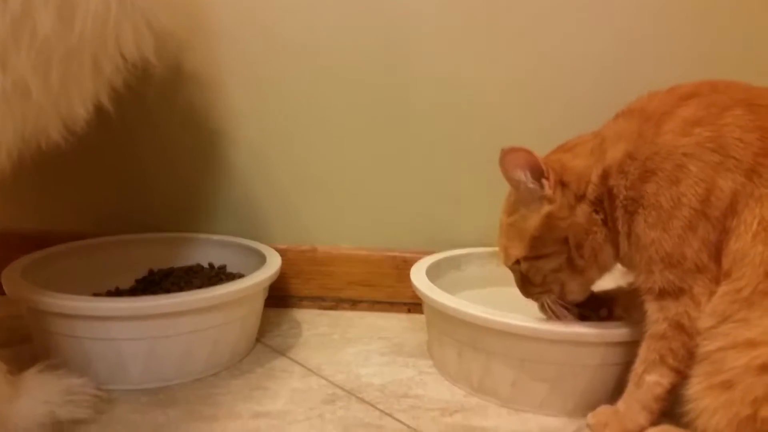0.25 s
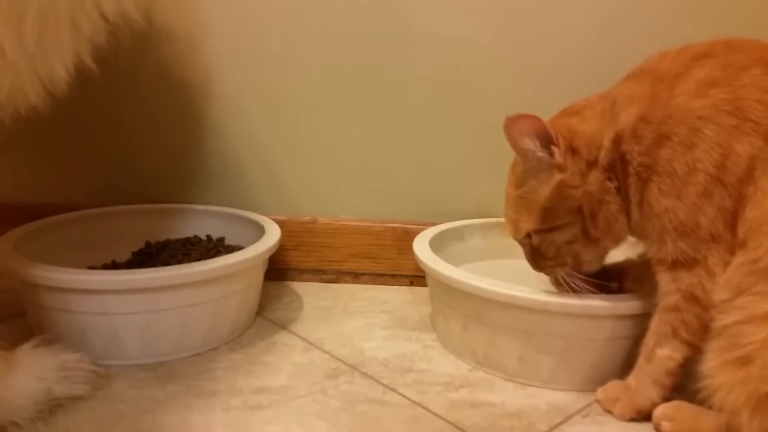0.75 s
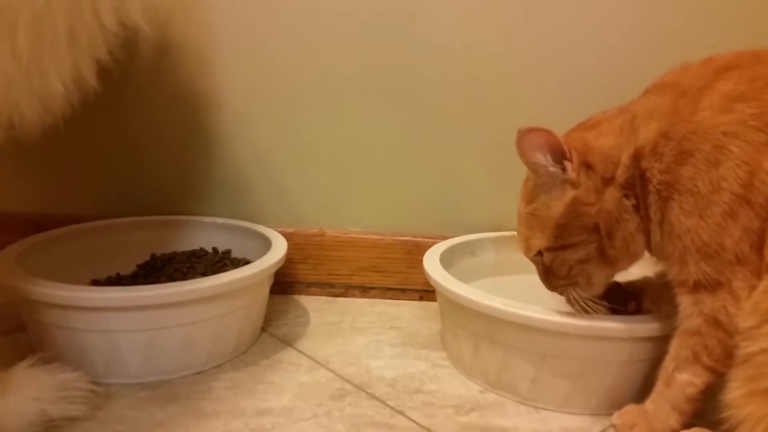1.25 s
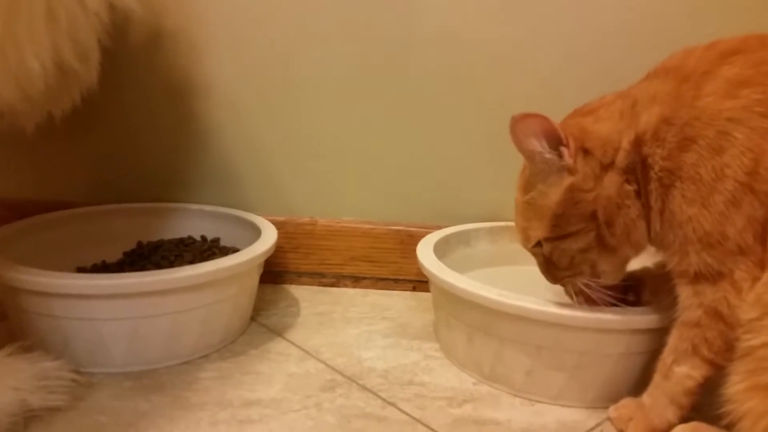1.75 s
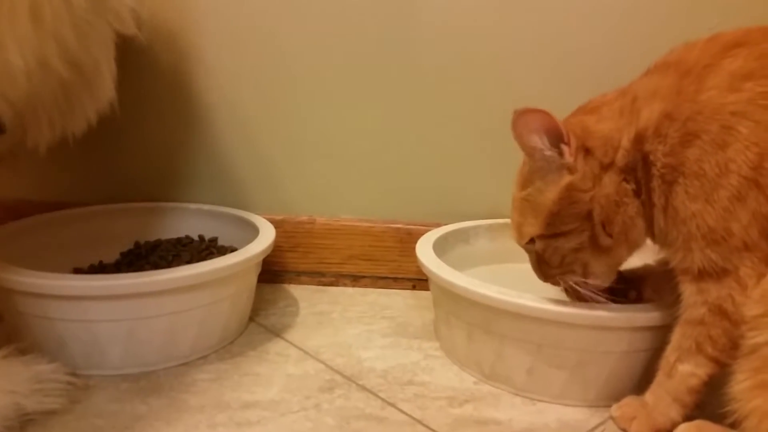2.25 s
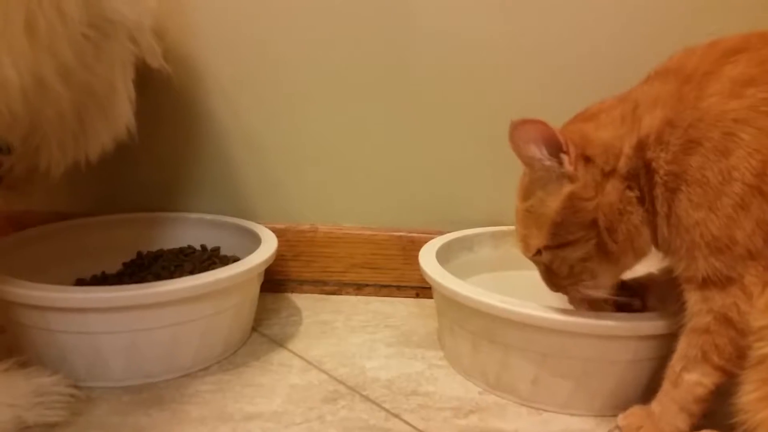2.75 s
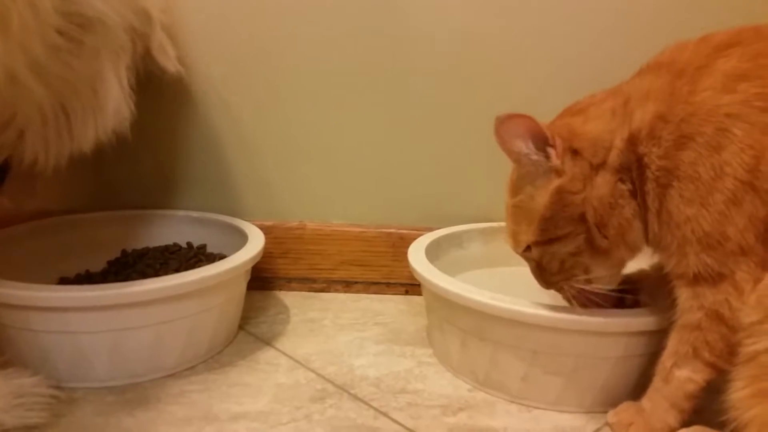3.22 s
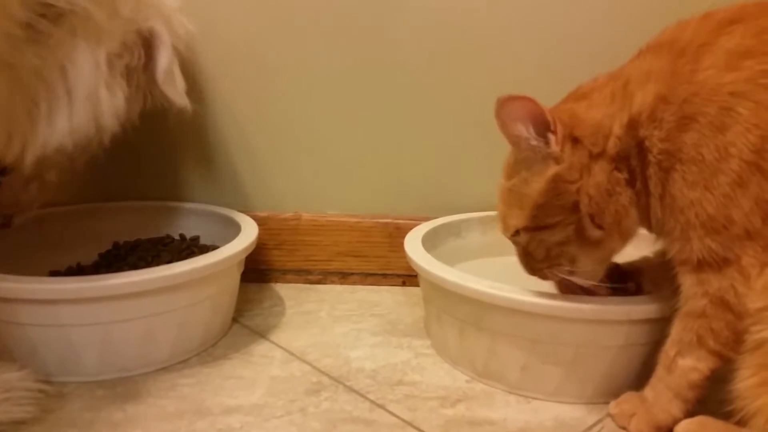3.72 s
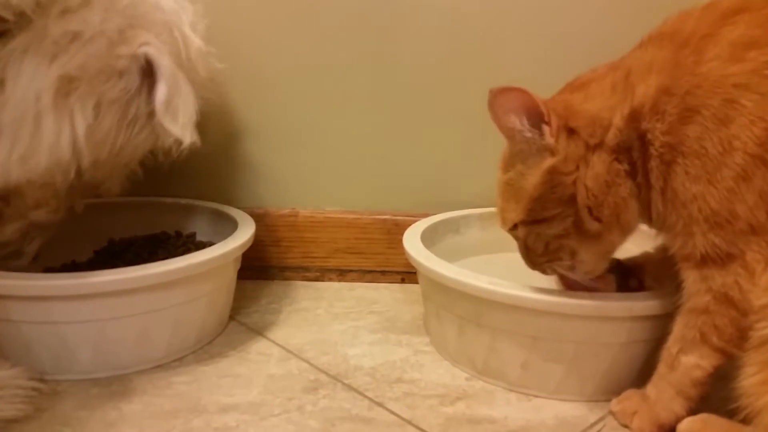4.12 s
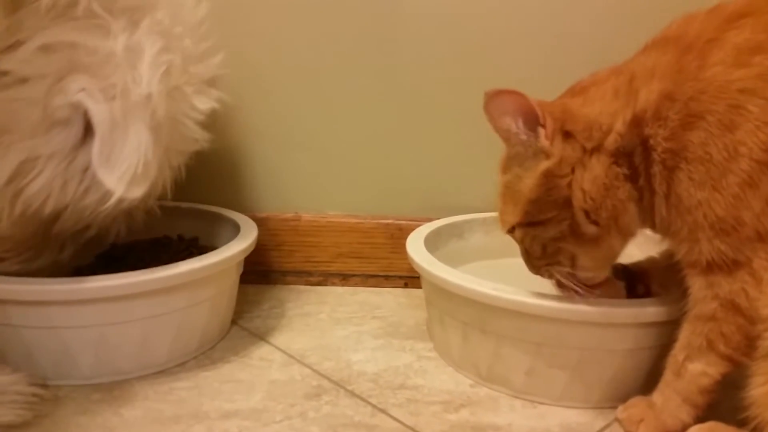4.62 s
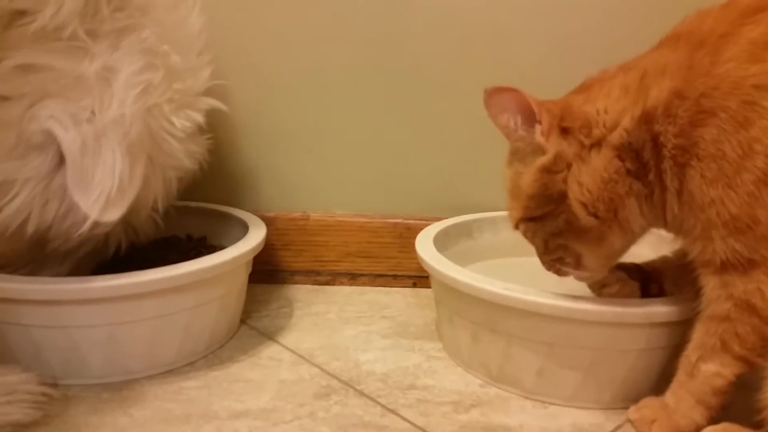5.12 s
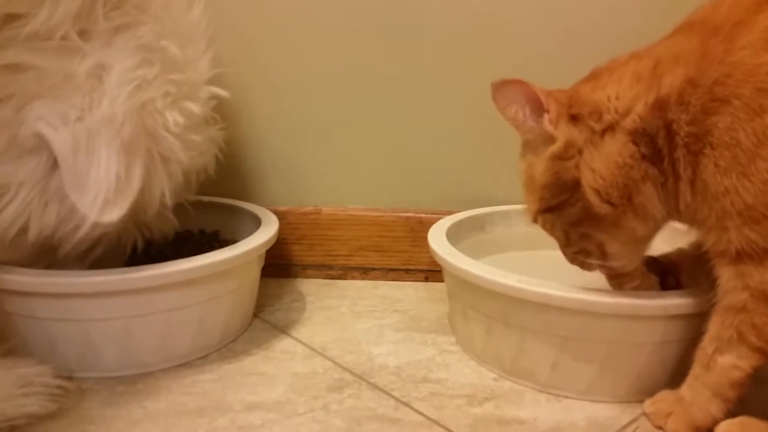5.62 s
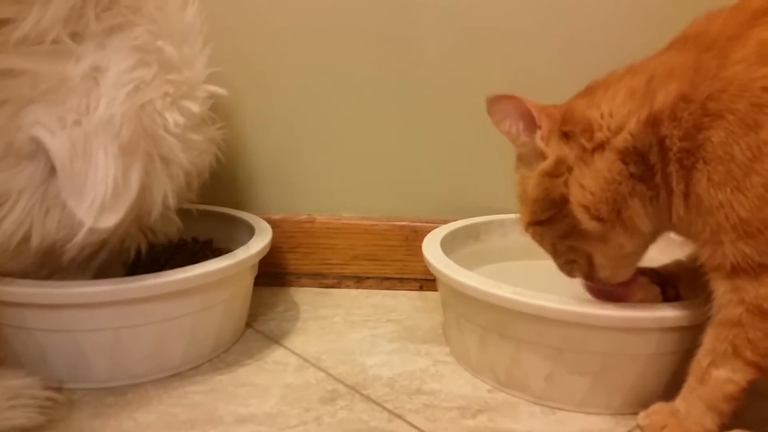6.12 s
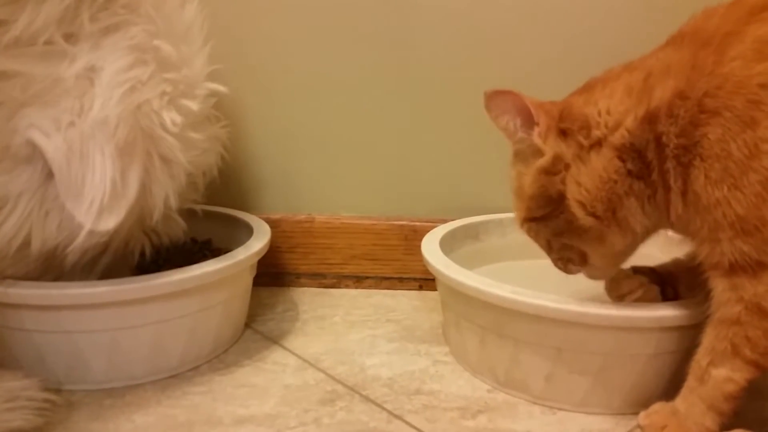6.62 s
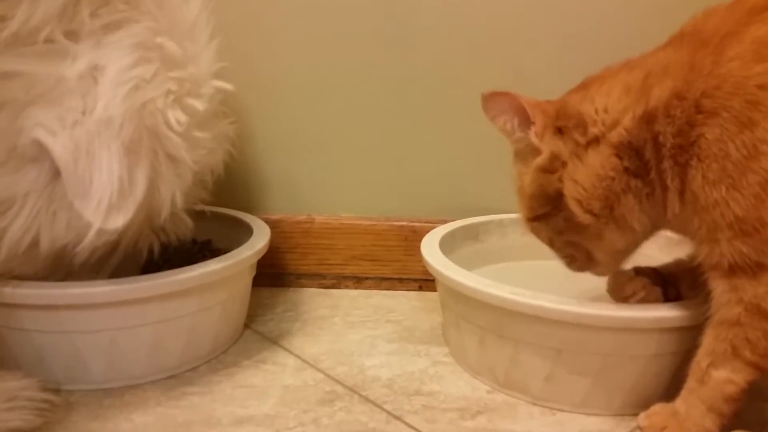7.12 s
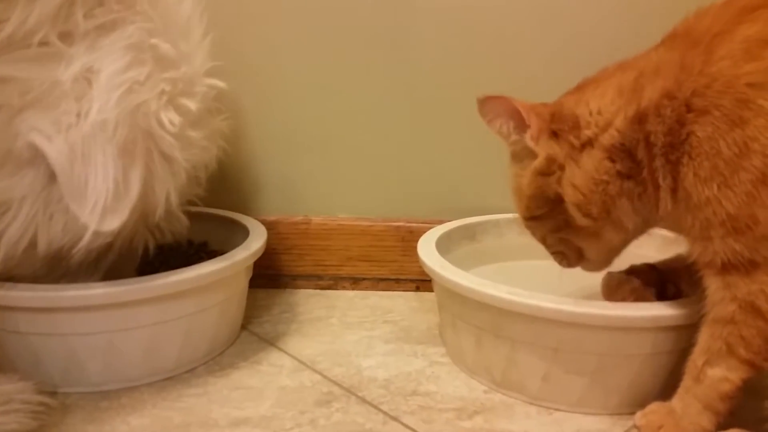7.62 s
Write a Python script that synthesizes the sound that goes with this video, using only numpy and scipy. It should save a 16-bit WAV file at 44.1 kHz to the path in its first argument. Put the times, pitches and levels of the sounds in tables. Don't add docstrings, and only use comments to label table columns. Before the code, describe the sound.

Indoors in a small tiled kitchen, a low refrigerator hum throbs slowly under soft air noise. Close by, a cat laps water with sparse, faint, high wet ticks and a brief fizzy lick. After more than five seconds a dog begins cracking dry kibble on the left: brittle snaps, splinters and grinding crumbs, with dull plastic bowl bumps. A close stereo phone microphone adds faint hiss.

```python
import sys
import numpy as np
from scipy import signal
from scipy.fft import rfft, irfft, next_fast_len
from scipy.io import wavfile
from scipy.ndimage import uniform_filter1d

SR = 44100
rng = np.random.default_rng(int(sys.argv[2]) if len(sys.argv) > 2 else 0)


def unload_audio(sound):
    columns = np.transpose(np.atleast_2d(sound))
    steps = np.round(np.clip(columns, -1, 1) * 32767)
    wavfile.write(sys.argv[1], SR, steps.astype(np.int16))


def field_ratio(decibels):
    return 10 ** (np.asarray(decibels, dtype=float) / 20)


N = 346625


def unit(x):
    return x / np.sqrt(np.mean(x ** 2) + 1e-20)


def along(points, hz):
    f, value = np.transpose(points)
    return np.interp(np.log(hz + 1), np.log(f + 1), value)


def curves(rows):
    s, *columns = np.transpose(rows)
    return [np.interp(np.arange(N) / SR, s, column) for column in columns]


def filtered(x, response):
    size = next_fast_len(N + SR // 2)
    return irfft(rfft(x, size) * response(np.fft.rfftfreq(size, 1 / SR)), size)[..., :N]


def resonance(hz, width_hz):
    return lambda f: 1j * f * width_hz / (hz * hz - f * f + 1j * f * width_hz)


def rung(burst, hz, width_hz):
    hz_kept = min(hz, 16000)
    b, a = signal.iirpeak(hz_kept, hz_kept / width_hz, SR)
    ring = signal.lfilter(b, a, signal.lfilter(b, a, burst))
    return ring / abs(ring).max()


def grains(per_second, spread_db):
    hits = rng.random(N) < per_second / SR
    sizes = field_ratio(spread_db * rng.exponential(size=N))
    return unit(hits * rng.standard_normal(N) * sizes)


def strokes(rows):
    attack_s, t60 = 0.011, .09
    t = np.arange(N) / SR
    level = np.zeros(N)
    for s, held, db in rows:
        attack = np.clip((t - s) / attack_s, 0, 1)
        level += attack * field_ratio(db - 60 * np.clip(t - s - held, 0, 3) / t60)
    return level


def patchy(depth_db):
    z = signal.stft(rng.standard_normal((2, N + 2048)), nperseg=1024)[2]
    field = uniform_filter1d(rng.standard_normal(z.shape), size=16, axis=1)
    field = uniform_filter1d(field, size=3, axis=2)
    return signal.istft(z * field_ratio(depth_db * unit(field)), nperseg=1024)[1][:, :N]


# f/Hz, left level/dB, right
# level/dB
CAPSULE_HISS = [(1020, -11, -11.5), (3100, -13.5, -16), (3990, 8, -12), (4560, 3, -12), (5300, -34, -18),
                (7040, -18, -9.5), (7800, -3.5, -15.5), (9250, -11.5, -8.5), (11200, -0.5, -9),
                (13500, -2.5, -1), (15500, 3.5, 2)]


def capsule_hiss():
    hz, *sides = np.transpose(CAPSULE_HISS)
    colour = lambda f: field_ratio([along(np.transpose([hz, side]), f) for side in sides])
    return field_ratio(-69) * filtered(patchy(depth_db=2.5), colour)


# f/Hz, density level/dB
AIR_COLOUR = [(20, -17), (30, -6), (50, -3.5), (100, 0.5), (250, -0.5), (450, -6), (800, -10.5),
              (1100, -17), (1600, -20), (2200, -28), (3200, -39), (5000, -48), (9000, -57.5), (16000, -67)]
# f/Hz, width/Hz, level/dB
BOOMS = [(120.3, 19.7, 6), (144.3, 6.5, -3), (276, 19, 1.5), (392.3, 19.2, 7.5), (840, 20, -7.5),
         (1314, 47, 8.5)]
# f/Hz, correlation/1
AIR_LIKENESS = [(60, 0.85), (180, 1), (550, 0.65), (1650, -0.26), (4970, 0.15), (15000, -0.52)]


def fridge_air():
    def mid_side_response(f):
        boom = 1 + sum(field_ratio(db) * abs(resonance(hz, width)(f)) ** 2 for hz, width, db in BOOMS)
        angle = np.arccos(np.clip(along(AIR_LIKENESS, f), -1, 1)) / 2
        return field_ratio(along(AIR_COLOUR, f)) * boom * [np.cos(angle), np.sin(angle)]
    mid, side = filtered(rng.standard_normal((2, N)), mid_side_response)
    return field_ratio(-46.0) * unit(np.array([mid + side, mid - side]))


# t/s, f/Hz, level/dB
FAN_TONE = [(0, 114.31, -42.9), (.79, 113.5, -41.5), (1.57, 113.87, -41.7), (2.36, 113.65, -43.5),
            (3.14, 113.64, -42), (3.93, 113.64, -41.7), (4.72, 113.51, -39), (5.5, 113.48, -40.4),
            (6.29, 113.54, -41.3), (7.07, 113.65, -40.7), (7.86, 114.04, -40.8)]
# f/Hz, level/dB, left-right level/dB, moment in step with the fan t/s
BEATING_TONES = [(118.55, -46.9, -.7, .2388), (119.99, -46.8, -1, .0903), (78.36, -49.5, -.6, .0107),
                 (58.64, -55.6, -1.3, .2478), (59.27, -62.6, 4.9, .05)]
# f/Hz, level/dB, left-right level/dB, left lead/rad
WEAK_ORDERS = [(49, -67.5, 10, 5.1), (139.5, -68.5, -5.5, 4.2), (196.9, -57, -6, 0.58),
               (231.9, -64.5, -10, -0.4), (244.3, -75, 5.5, -1.3), (269, -58.5, -1.5, -0.1),
               (290.5, -70, 3.5, -1), (301.4, -78.5, -7, 1.5), (297.2, -62.5, 3, 1.5),
               (322, -77.5, -12.5, -4.3), (345, -60.5, -0.5, 0.2), (362, -66, 6, -0.1),
               (360, -75.5, -3, -0.055), (393.2, -64.5, 3.5, 0.0), (471, -75.5, 9.5, -2.5),
               (470, -74.5, -8.5, 3.3), (475, -70.5, 0.5, 3), (599.4, -70, 2.5, 0.7), (710, -71, 11, -2),
               (782.5, -71.5, 1.5, 0.4), (849, -80, 16.5, -1.6), (847, -74.5, 18, 0.3),
               (848.4, -70, 12, 2.5), (868, -75.5, 6.5, -2.5), (900, -91.5, 5, -8)]


def fridge_tones():
    t = np.arange(N) / SR
    half = np.array([[.5], [-.5]])
    fan_hz, fan_db = curves(FAN_TONE)
    fan_phase = 2 * np.pi * np.cumsum(fan_hz) / SR
    hum = field_ratio(fan_db) * np.cos(fan_phase) * field_ratio(-half)
    for hz, db, pan, s in BEATING_TONES:
        hum += field_ratio(db + pan * half) * np.cos(2 * np.pi * hz * (t - s) + fan_phase[round(s * SR)])
    for hz, db, pan, lead in WEAK_ORDERS:
        hum += field_ratio(db + pan * half) * np.cos(2 * np.pi * (hz * t + rng.random()) + lead * half)
    return np.sqrt(2) * hum


# f/Hz, t60/s
ROOM_T60 = [(500, 1), (3000, 0.52), (10000, 0.37)]


def kitchen(x, wet_db):
    hz, t, z = signal.stft(rng.standard_normal((2, SR // 2)), SR, nperseg=256)
    decay = field_ratio(-60 * t / along(ROOM_T60, hz)[:, None])
    tail = signal.istft(z * decay, SR, nperseg=256)[1]
    tail *= field_ratio(wet_db) / np.linalg.norm(tail[0])
    tail[:, :40] = 0
    for side in tail:
        side[rng.integers(20, 200, size=9)] += 0.12 * rng.standard_normal(size=9)
    return signal.fftconvolve(np.atleast_2d(x), tail, axes=1)[:, :N]


# t/s, peak level/dB, f/Hz, t60/s
BOWL_KNOCKS = [(1.12, -42, 840, 0.025), (1.281, -46, 1210, 0.047), (4.052, -50, 740, 0.023),
               (5.582, -37, 930, 0.02), (5.596, -35.5, 830, 0.023), (5.614, -41, 860, 0.035),
               (5.634, -40, 810, 0.031), (5.654, -41, 840, 0.018), (5.874, -42, 821, 0.016),
               (6.552, -34, 775, 0.016), (7.636, -39, 1020, 0.018), (7.648, -35, 730, 0.029),
               (7.728, -42, 820, 0.022)]
# start t/s, length/s, level/dB
FUR_BRUSHES = [
    (.05, 0.019, -74),
    (1.26, .1, -80),
    (1.4, .08, -79),
]


def bowls():
    knocks, t = np.zeros(N + SR), np.arange(SR // 8) / SR
    for s, db, hz, t60 in BOWL_KNOCKS:
        modes = np.sin(2 * np.pi * hz * t)
        modes += .5 * np.sin(2 * np.pi * hz * rng.uniform(1.16, 1.3) * t)
        modes += 0.32 * np.sin(2 * np.pi * hz * rng.uniform(1.46, 1.79) * t)
        soft_onset = 1 - np.exp(-t / 0.00053)
        knocks[round(s * SR):][:len(t)] += field_ratio(db - 3 - 60 * t / t60) * soft_onset * modes
    fur = unit(filtered(grains(3000, spread_db=4.5), lambda f: resonance(3900, 2500)(f) ** 2))
    return knocks[:N] * field_ratio([[1.5], [-1.5]]) + field_ratio([[-9], [-2]]) * strokes(FUR_BRUSHES) * fur


# t/s, peak level/dB, left-right level/dB
TONGUE_LAPS = [(0.041, -64, 7), (0.07, -59, 2), (0.2444, -67, 6), (0.4813, -66, 5), (0.7821, -62.5, 9),
               (1.229, -61.5, 12), (1.296, -61, 10), (1.3622, -53.5, 10), (1.5905, -56, 6), (4.06, -60, 1),
               (4.1564, -66, 2), (4.554, -58.5, 6), (4.8924, -69, 5), (5.162, -64, 5), (5.54, -61, 4),
               (5.5792, -64, 4), (5.619, -60, 7), (5.8641, -65, 9)]
# t/s, peak level/dB, centre f/Hz,
# left-right level/dB
LIP_SMACKS = [(0.2887, -64, 9000, 6), (0.3257, -61, 13000, 3.5), (0.5994, -69, 8000, 5),
              (0.85, -55, 10500, 4), (0.8784, -48, 15700, 2), (0.9394, -61, 14400, 3),
              (1.1024, -60, 14500, 8), (1.338, -55, 11400, 20), (1.4631, -60, 9500, 5),
              (1.5439, -60, 14700, 7), (1.6352, -59, 6300, 3), (1.281, -63, 3540, 1),
              (2.3014, -65, 15000, 4), (2.6943, -58.5, 11600, 0), (3.056, -62.5, 14800, -2),
              (3.6614, -67, 15000, 5), (3.9986, -49.5, 15700, 2), (4.1124, -65, 8200, 6),
              (4.2637, -61.5, 8500, 0), (4.94, -61, 13200, 7), (5.3154, -71, 7900, 7),
              (7.1175, -47, 15000, 3), (7.7962, -64, 6000, 1), (5.458, -62, 3500, 0),
              (6.467, -64, 4220, -3), (6.477, -58, 3000, 0), (7.3776, -58, 10500, 0)]
# start t/s, length/s, level/dB
WET_LICKS = [
    (1.225, .04, -70),
    (1.285, 0.064, -67.5),
    (1.36, 0.083, -80),
]


def tongues():
    lap_hz, lap_q, smack_q = 7950, 3.4, 2.4
    out, t = np.zeros((2, N + SR)), np.arange(300) / SR
    ticks = [(s, db, lap_hz, pan, lap_q) for s, db, pan in TONGUE_LAPS]
    ticks += [(*row, smack_q) for row in LIP_SMACKS]
    for s, db, hz, pan, q in ticks:
        burst = field_ratio(-60 * t / 0.0061) * rng.standard_normal(len(t))
        snap = rung(burst, hz, hz / q)
        sides_db = db - 1.0 + 1.7 * pan * np.array([[.3], [-.7]])
        out[:, round(s * SR):][:, :len(t)] += field_ratio(sides_db) * snap
    fizz = unit(filtered(grains(5000, spread_db=4.0), lambda f: resonance(9500, 6000)(f) ** 2))
    return out[:, :N] + field_ratio([[-4], [-9]]) * strokes(WET_LICKS) * fizz


def snap_shape(points, size=512):
    cepstrum = irfft(np.log(field_ratio(along(points, np.fft.rfftfreq(size, 1 / SR)))))
    cepstrum[1:size // 2] *= 2
    cepstrum[size // 2 + 1:] = 0
    return irfft(np.exp(rfft(cepstrum)))


CRACK_HZ = [400, 1100, 1700, 2400, 3700, 8200, 12000, 15500]


def kibble_snap(jaw_db, splinter_db):
    t = np.arange(300) / SR
    shared, left, right = rng.standard_normal((3, len(t)))
    burst = .22 * field_ratio(-60 * t / 0.0072) * (shared + .8 * np.array([left, right]))
    burst[:, 0] = -1
    levels_db = [jaw_db - 9, jaw_db - 1.0, jaw_db + 1.0, 0.76 * jaw_db, -1.5,
                 splinter_db + 0.5, splinter_db - 5.5, splinter_db - 21.5]
    colour = snap_shape(list(zip(CRACK_HZ, levels_db)))
    crack = signal.fftconvolve(burst, colour[None], axes=1)
    strength = np.sqrt(np.mean(abs(signal.hilbert(crack)) ** 2, axis=0))
    return crack / strength.max(), strength.argmax()


def broken_pieces(cracks):
    first_gap_s, gap_growth, first_db, loss_db = .005, 2.6, -11.5, 3
    pieces = []
    for s, db, jaw_db, splinter_db in cracks:
        for k, (late, size) in enumerate(rng.uniform(-0.72, 1, (3, 2))):
            piece_s = s + first_gap_s * gap_growth ** (k + .4 * late)
            piece_db = db + first_db - loss_db * k + 3 * size
            pieces.append((piece_s, piece_db, jaw_db, splinter_db))
    return pieces


def grinding(starts, levels_db, t60):
    creak_db, creak_t60 = -3.5, 0.083
    power = np.bincount(np.round(starts * SR).astype(int), field_ratio(levels_db) ** 2, N)
    fading = lambda x, seconds: signal.lfilter([1], [1, -field_ratio(-120 / (seconds * SR))], x)
    creak = fading(power[::-1], creak_t60)[::-1]
    return np.sqrt(fading(power, t60) + field_ratio(creak_db) ** 2 * creak)


# f/Hz, level/dB
COARSE_COLOUR = [(400, -31), (900, 3), (1600, 14.5), (2400, -3.5), (4200, -2), (6000, -11), (9000, -38)]
# f/Hz, level/dB
FINE_COLOUR = [(3000, -33), (5500, -29), (8000, 6), (11000, 11), (14000, -18), (16000, -30)]


def crumbs(cracks):
    def grit(colour):
        shared = grains(900, spread_db=2)
        own = np.array([grains(900, spread_db=2), grains(900, spread_db=2)])
        return unit(filtered(shared + .7 * own, lambda f: field_ratio(along(colour, f))))
    s, db, jaw_db, splinter_db = np.transpose(cracks)
    coarse = grinding(s, db - 28.5, t60=0.15) * grit(COARSE_COLOUR)
    fine = grinding(s, db - 34.5 + 0.9 * splinter_db, t60=0.11) * grit(FINE_COLOUR)
    return coarse + fine


# t/s, peak level/dB, jaw knock over shell/dB, splinters over shell/dB
KIBBLE_CRACKS = [(5.504, -40, 9.5, -21.5), (5.641, -39.5, -2, -4), (5.6495, -28, 8, -11),
                 (5.6655, -34, 8, -20.5), (5.677, -31, -1, -5), (5.685, -29.5, 12, -12),
                 (5.6949, -29.5, 6.5, -3), (5.7055, -35, 9, 1), (5.9364, -35.5, 5.5, -11),
                 (5.9444, -32, 17, -12), (6.065, -43, 7, -3), (6.1093, -28, 6, -5.5),
                 (6.1224, -36.5, 18, -4), (6.2313, -35.5, 5, -17), (6.31, -32.5, 12, -17),
                 (6.5393, -26, 15.5, -13), (6.55, -45, -1, -9), (6.569, -39, 10.5, -5),
                 (6.591, -39, 14, -9), (6.7186, -42, 9, -11), (6.921, -45.5, 9, -5), (7.009, -27.5, 17, -2),
                 (7.0611, -40.5, 17, -4), (7.6179, -32, 12.5, -10.5), (7.6359, -25, 5, 7),
                 (7.648, -28.5, 4, -6), (7.6705, -28.5, 16, 5), (7.6983, -28, -1, 3),
                 (7.7177, -35, 13.5, -16), (7.7321, -49, 11, -4)]


def dog():
    out = np.zeros((2, N + SR))
    for s, db, jaw_db, splinter_db in KIBBLE_CRACKS + broken_pieces(KIBBLE_CRACKS):
        crack, peak_at = kibble_snap(jaw_db, splinter_db)
        out[:, round(s * SR) - peak_at:][:, :crack.shape[1]] += field_ratio(db - 2.5) * crack
    out[:, :N] += crumbs(KIBBLE_CRACKS)
    return np.array([out[0, :N], np.roll(out[1], 5)[:N]])


def scene():
    bites, near = dog(), tongues() + bowls()
    animals = bites + kitchen(bites, wet_db=-5.0) + near + kitchen(near, wet_db=-2.5)
    return animals + fridge_tones() + fridge_air()


# f/Hz, level/dB
LEFT_COLOUR = [(60, 0.5), (300, -0.5), (700, 1), (1500, 2), (2700, 0.5), (3900, 12.5), (4700, -5),
               (5800, 1.5), (7200, 1), (8000, 10.5), (9200, 4.5), (11000, 5), (16000, 0)]
# f/Hz, level/dB
RIGHT_COLOUR = [(60, .5), (300, -1), (700, 1), (1500, 0.5), (2700, 1.5), (3900, 11.5), (4700, 8),
                (5500, 7.5), (7000, 7.5), (9000, -11.5), (11000, -2.5), (16000, -10)]


def phone_ports(x):
    return filtered(x, lambda f: field_ratio([along(LEFT_COLOUR, f), along(RIGHT_COLOUR, f)]))


def low_pass(x):
    return signal.sosfilt(signal.butter(12, 16970, fs=SR, output="sos"), x)


def record(dry):
    dry = dry * np.clip(np.arange(N)[::-1] / 150, 0, 1)
    top_hz = 15830
    mix = filtered(phone_ports(dry) + capsule_hiss(), lambda f: f < top_hz)
    return low_pass(mix)


dry = scene()
out = record(dry)
unload_audio(out)
```